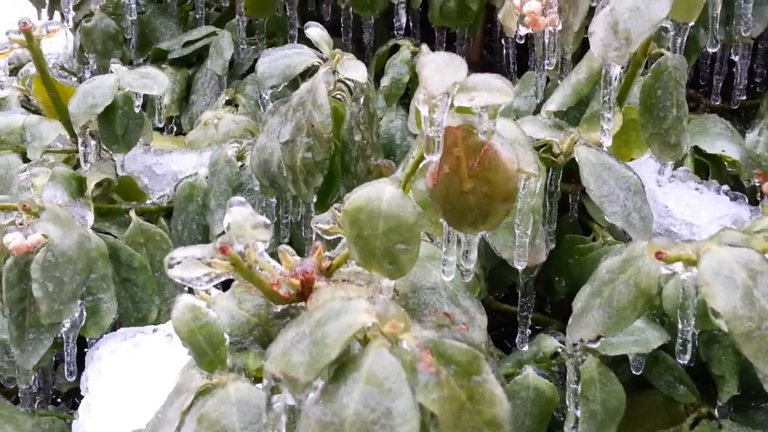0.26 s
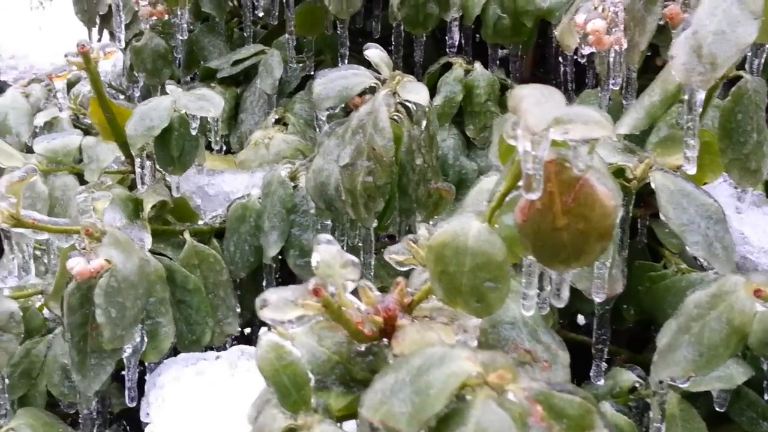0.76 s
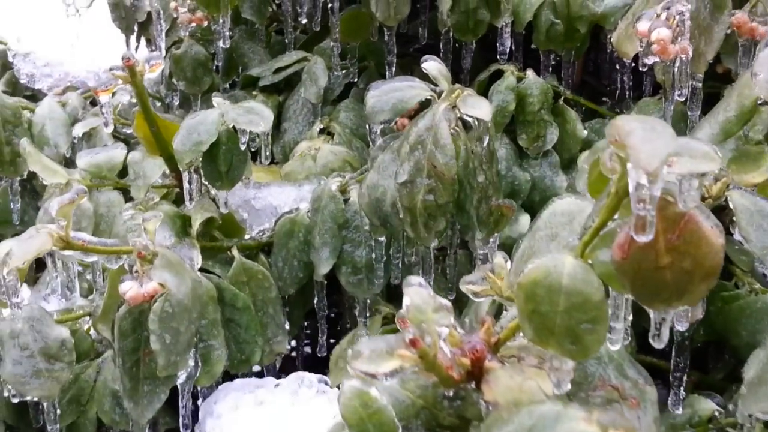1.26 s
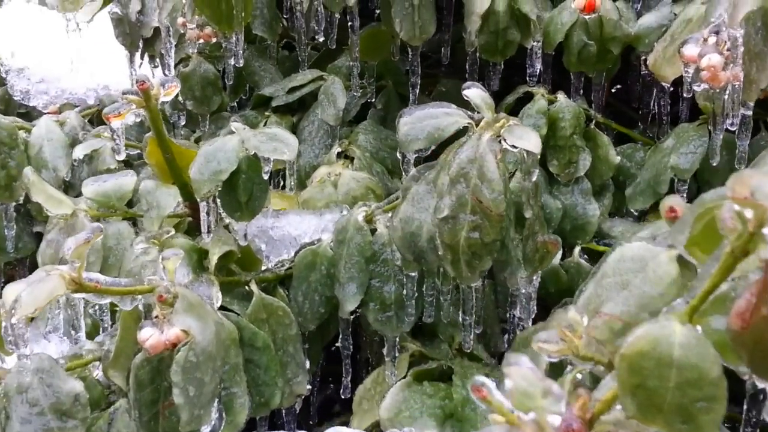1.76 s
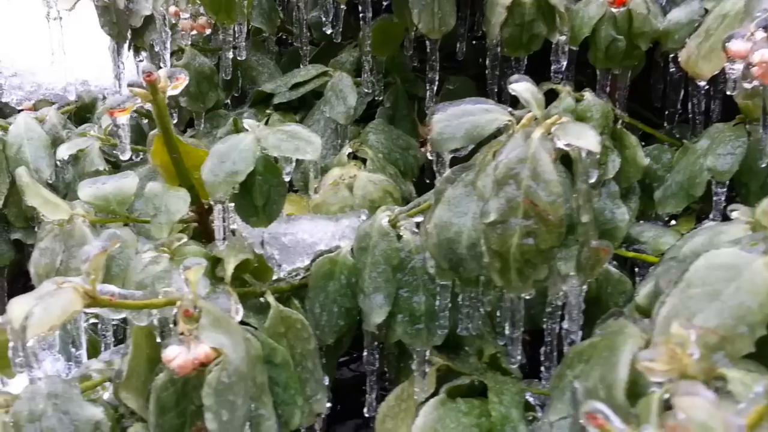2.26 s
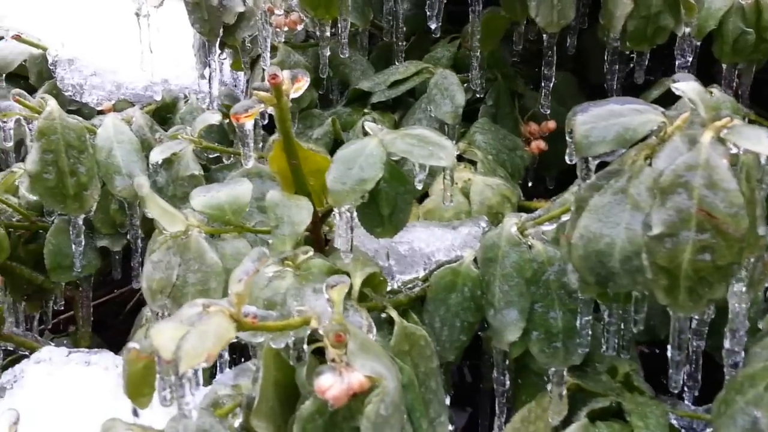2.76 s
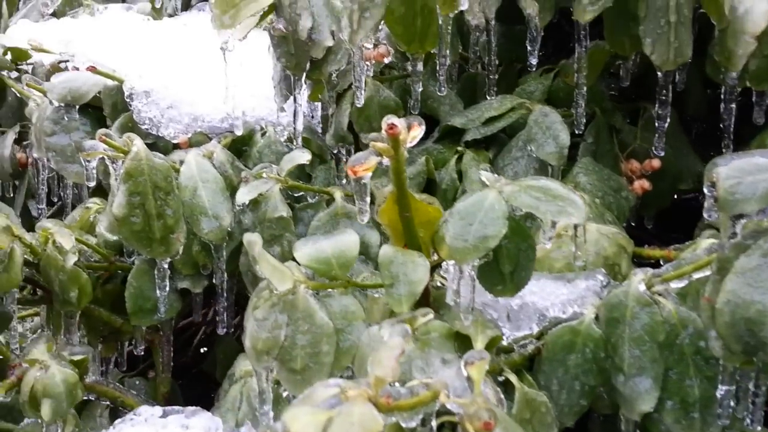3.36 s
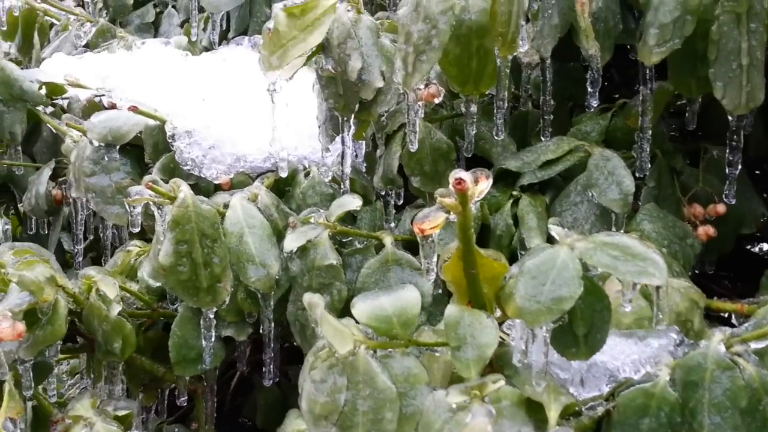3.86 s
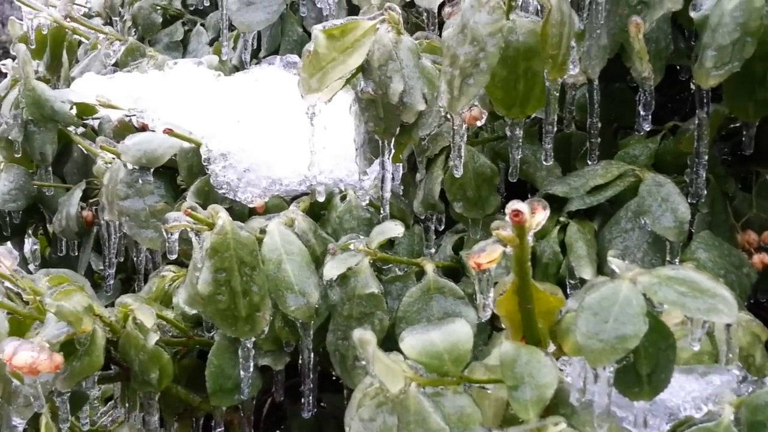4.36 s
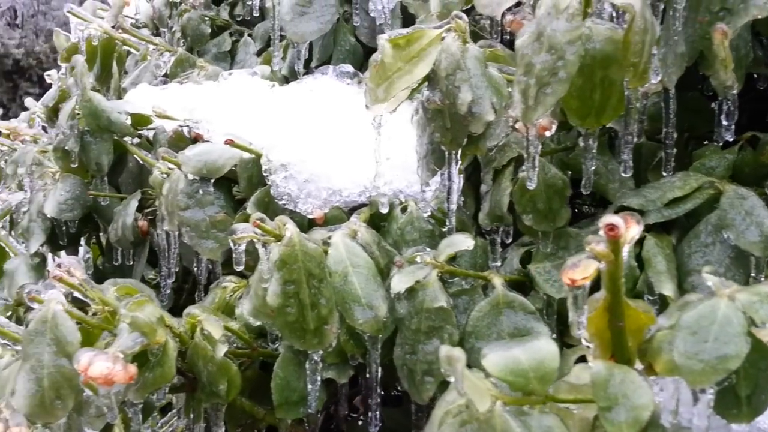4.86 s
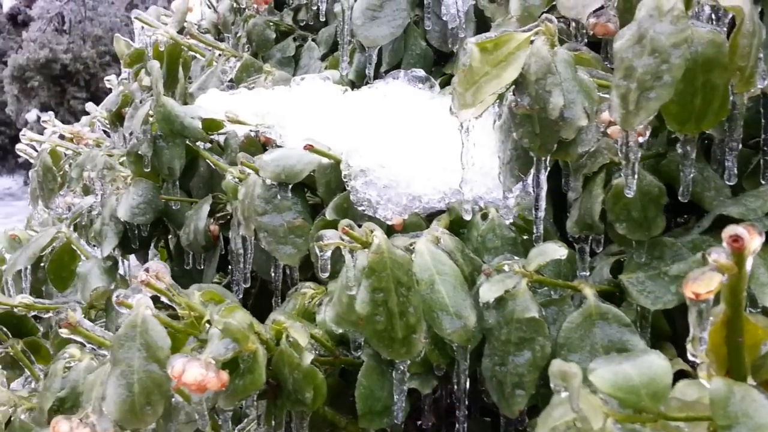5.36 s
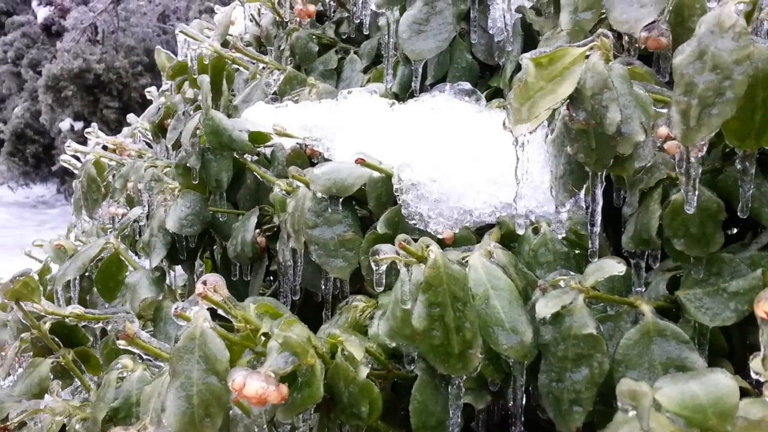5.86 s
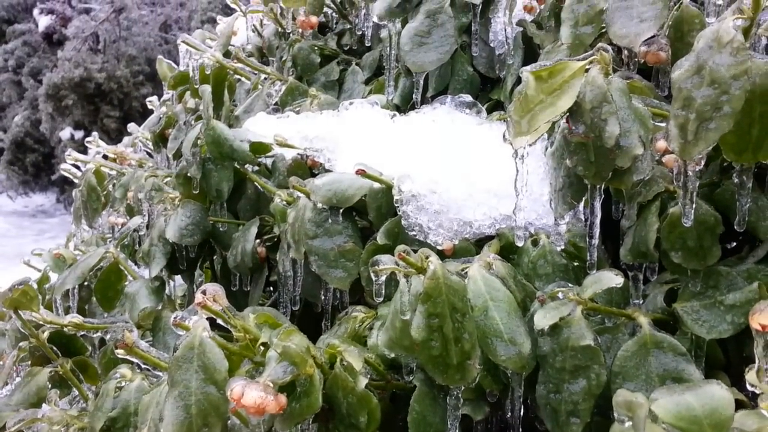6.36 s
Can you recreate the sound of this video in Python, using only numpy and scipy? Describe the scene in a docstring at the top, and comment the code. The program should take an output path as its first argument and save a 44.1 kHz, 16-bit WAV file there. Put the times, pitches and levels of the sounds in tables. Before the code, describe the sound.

Very close stereo view of an ice-coated bush outdoors. Over faint low rumble and hiss, light cracks lead to a sharp crunch, then a dense flurry of bright snaps, woody knocks and brief crunches. One more strong break follows, with a glassy clink. Crumbs trickle onto leaves and settle; later come soft dull bumps on the left, fine rustling and tiny clinks.

```python
"""A low, uneven outdoor rumble, a faint hiss and the fine rustle of iced leaves open the scene.
Ice glaze on an evergreen bush breaks close by: single snaps are fracture bursts with twig knocks; in crunches
a whole shell gives way as dense fractures and shakes its leaf. Branches spring back as dull thuds.
Soft pressure bumps reach the left port; a few crumbs tick on the camera case. Loose bits clink as short
resonances and patter as sparse ticks; leaves scatter the breaking sounds in a short bright tail."""
import sys
import numpy as np
from scipy import signal
from scipy.fft import rfft, irfft, next_fast_len
from scipy.io import wavfile
from scipy.ndimage import map_coordinates

SR = 44100
rng = np.random.default_rng(int(sys.argv[2]) if len(sys.argv) > 2 else 0)


def transcribe(u):
    """Save the signal u as a 16-bit wav file named by the first command-line argument.

    u: samples, shape (n,) or (channels, n), limited to [-1, 1]; the rate is SR.
    q: integer samples, one column per channel.
    """
    v = np.clip(np.atleast_2d(u).T, -1, 1)
    q = np.round(v * 32767).astype(np.int16)
    wavfile.write(sys.argv[1], SR, q)


N = 291489

# Table levels are nominal: the sources add their own trims. pan = left over right.
# colour of distant rumble: f/Hz, relative density/dB
RUMBLE_COLOUR = [(20, -18), (35, -10), (55, 2.5), (110, 1), (170, -3.5), (260, -7), (500, -14), (900, -21),
                 (2000, -37), (5000, -26.5)]
# rumble course: t/s, level/dB
RUMBLE_LEVEL = [(0, -53), (2.2, -52.5), (4.4, -54), (5.15, -53.5), (5.4, -48), (5.7, -53.5), (6.6, -52)]
# colour of hiss: f/Hz, relative density/dB
HISS_COLOUR = [(200, -23), (900, -1), (1700, 4.5), (2500, 2.5), (4000, 0), (7000, -1.5), (9000, -6.5),
               (14000, -4)]
# stirring and rustle of iced leaves: t/s, level/dB
STIR = [(0, -58), (.78, -52.5), (1.02, -61), (1.43, -66), (1.49, -44.5), (1.65, -45), (2.18, -44),
        (2.42, -42), (2.9, -47), (3.08, -55.5), (4.3, -56.5), (4.6, -46), (4.85, -44.5), (5.12, -51.5),
        (5.43, -44), (5.82, -45.5), (6.38, -42.5), (6.6, -47.5)]
# colour of rustle and crumbs: f/Hz, relative density/dB
PATTER_COLOUR = [(400, -4), (1000, -10), (1800, -5.5), (3000, -6), (5200, -1.5), (7000, 0.5), (14000, -8.5)]
# crumbs slipping off a leaf: t/s, level/dB
SHOWERS = [(0.195, -42.5), (0.65, -46), (0.709, -45), (0.859, -44.5), (1.205, -49), (2.319, -38),
           (2.931, -43), (3.204, -48.5), (3.374, -46.5), (3.95, -46), (4.05, -47), (4.335, -46),
           (4.969, -42), (5.655, -46.5)]
# single fractures, and dry ticks of crumbs on the camera case (large pan):
# t/s, crack or tick level/dB, knock level/dB, knock f/Hz, pan/dB (halved for the knock)
SNAPS = [(0.111, -31, -45, 2320, -2), (0.255, -25, -36.5, 2240, -1), (0.273, -26, -51, 2120, -4),
         (0.315, -26, -51, 2350, -6), (0.3775, -22, -25, 530, 0), (0.3832, -15, -22, 605, -11),
         (1.1225, -33.5, -37, 2480, 34), (1.2005, -48, -43.5, 1470, 2), (1.2367, -39.5, -65, 1520, -2),
         (1.473, -43.5, -49, 2600, -1), (1.5547, -26, -44, 1820, -3), (1.5768, -20.5, -23.5, 1590, -2.5),
         (1.6777, -22, -15, 1520, -3), (1.7436, -19, -15.5, 384, 0), (1.7822, -26.5, -25, 720, -1.5),
         (1.8232, -22, -32, 1500, -4), (1.845, -15, -23, 1160, 1), (1.9427, -24, -38, 2700, 1),
         (2.0198, -24, -29, 750, 3), (2.0264, -15.5, -26, 1180, -3.5), (2.158, -38, -62, 2150, -8),
         (2.5001, -38, -49, 1640, 10), (2.5503, -27.5, -43, 1020, 8), (2.6774, -21.5, -24.5, 1480, -4),
         (2.6914, -12, -29, 1900, -5), (2.7123, -19.5, -22, 1290, 0), (4.4596, -41, -73, 2040, -2),
         (4.5877, -39, -72, 1390, -7), (6.4313, -29, -61, 2250, 17)]
# colour of a crack or tick: f/Hz, relative density/dB
CRACK_COLOUR = [(300, -9), (1000, -7.5), (2000, 3.5), (4000, 3), (8000, 8.5), (14000, -1.5)]
# decay of the scatter in the bush: f/Hz, t60/s
BUSH_T60 = [(300, 0.13), (1500, 0.073), (5000, 0.12), (14000, 0.19)]
# shells giving way: collapse t/s, build-up/s, length/s, splinter level/dB, leaf level/dB
CRUNCHES = [(0.377, 0.013, 0.029, -18, -26.5), (0.423, 0.004, 0.025, -29.5, -33),
            (1.851, 0.005, 0.017, -9, -12.5), (1.897, 0.003, 0.015, -27.5, -33.5),
            (1.997, 0.002, 0.012, -27, -35), (2.027, 0.004, 0.0083, -14.5, -21),
            (2.691, 0.014, 0.032, -17.5, -23), (2.81, 0.015, 0.027, -23.5, -30)]
# body of an ice-coated leaf on its twig: f/Hz, relative density/dB
LEAF_COLOUR = [(70, -44.5), (140, -17.5), (205, -2), (270, -10), (450, -7), (710, 3), (810, -2), (900, 1),
               (1030, -15.5), (1250, -6.5), (1490, 0.5), (1850, -15), (2350, -4), (4000, -27)]
# branches springing back: t/s, level/dB, f/Hz
THUDS = [(0.3784, -28, 163), (0.3825, -28, 337), (0.651, -46, 148), (1.743, -25.5, 200), (1.852, -43, 196),
         (2.822, -34, 218)]
# soft bumps at the left port: t/s, level/dB, nominal f/Hz (sets the pulse width)
BUMPS = [(0.9066, -34.5, 230), (5.2853, -34, 188), (5.374, -24, 195), (5.4062, -38, 200),
         (5.9244, -18, 238), (6.0365, -26, 174)]
# spells of smaller dropping pieces: start/s, end/s, level/dB, pan/dB (halved in use)
SPELLS = [(2.22, 2.62, -40.5, 10), (5.66, 6.42, -42, 27)]
# clearest ringing pieces: t/s, level/dB, f/Hz, pan/dB (halved in use)
CLINKS = [(2.8412, -23.5, 5130, -9), (5.641, -37.5, 5250, 19), (6.0055, -34.5, 6040, 19.5),
          (6.072, -34.5, 5800, 21), (6.3877, -33.5, 5600, 24)]
# colour of the two microphone ports: f/Hz, left gain/dB, right gain/dB
PORT_COLOUR = [(860, 3.5, 3.5), (1620, -0.5, -0.5), (2260, -2, -2), (3670, 4.5, -1), (4050, 6, -4),
               (5300, 4, -1.5), (7070, -2, 7), (7730, -5.5, -0.5), (9800, -3.5, -3), (10500, -2, -2.5),
               (13700, -13, -3.5), (15300, -38, -5)]

BLOW_S = 0.005  # duration to which the level of a single blow refers
LEAD_SAMPLES = 3  # the right port leads the left
CEILING, TOP_HZ = 0.85, 14650  # peak limit, band limit
DEBRIS_DB, DEBRIS_T60_S = -20, 0.29  # crumbs relative to the blow that sheds them, settling time
SHOWER_RISE_S = 0.011  # time to the peak of a shower
STRAIN_DB = -7  # first crackling relative to the collapse
SAG_DB, RELEASE_T60_S = 3, 0.01  # weakening over the collapse, then its decay
PIECE_GAP_S, PIECE_HZ = 0.085, 5180  # typical spacing and pitch of smaller pieces


def amp(db):
    """Decibels to gain."""
    return 10 ** (np.asarray(db) / 20)


def unit(x):
    """Scale to rms 1."""
    return x / np.sqrt(np.mean(x ** 2) + 1e-20)


def dose(x, db, length_s=BLOW_S):
    """Give x the energy of a sound of this level and length."""
    energy = np.mean(np.sum(x ** 2, axis=-1))
    return x * amp(db) * np.sqrt(length_s * SR / (energy + 1e-20))


def along(points, hz):
    """Interpolate (f/Hz, value) points on a log axis."""
    f, v = np.transpose(points)
    return np.interp(np.log(hz + 1), np.log(f + 1), v)


def curve(rows):
    """Interpolate (t/s, value) rows to one value per sample."""
    return np.interp(np.arange(N) / SR, *np.transpose(rows))


def wobble(rate_hz):
    """Smooth random curve with this many knots a second."""
    knots = rng.standard_normal(int(N * rate_hz / SR) + 4)
    return map_coordinates(knots, [np.arange(N) * rate_hz / SR])


def filtered(x, response):
    """Filter x by a complex response of frequency."""
    n = x.shape[-1]
    m = 2 * next_fast_len(n)
    return irfft(rfft(x, m) * response(np.fft.rfftfreq(m, 1 / SR)), m)[..., :n]


def coloured(x, points):
    """Causal minimum-phase filter through (f/Hz, gain/dB) points."""
    size = 2048
    cepstrum = irfft(np.log(amp(along(points, np.fft.rfftfreq(size, 1 / SR)))))
    # fold onto positive time
    cepstrum[1:size // 2] *= 2
    cepstrum[size // 2 + 1:] = 0
    impulse = irfft(np.exp(rfft(cepstrum)))
    return signal.fftconvolve(np.atleast_2d(x), impulse[None], axes=1)[:, :x.shape[-1]]


def pair(n, shared):
    """Two white noises with a share of power in common."""
    share = np.clip(shared, 0, 1)
    common = np.sqrt(share) * rng.standard_normal(n)
    return common + np.sqrt(1 - share) * rng.standard_normal((2, n))


def panned(pan_db):
    """Left and right gains of constant power."""
    return unit(amp([[pan_db / 2], [-pan_db / 2]]))


def add(track, t_s, x):
    """Mix x into the track at t_s."""
    start = max(round(t_s * SR), 0)
    track[:, start:start + x.shape[-1]] += x[:, :N - start]


def from_right(x):
    """A mono sound that reaches the right port slightly earlier."""
    return np.array([np.pad(x, (LEAD_SAMPLES, 0))[:len(x)], x])


def resonance(hz, width_hz):
    """Response of one damped mode."""
    return lambda f: 1j * f * width_hz / (hz * hz - f * f + 1j * f * width_hz)


def knock(t, hz, t60_s):
    """A few heavily damped swings, with no net push of air."""
    return np.gradient(t * np.sin(2 * np.pi * hz * t) * amp(-60 * t / t60_s))


def fractures(n, rate_hz, spread_db, life_s):
    """Envelope of tiny decaying fractures at random times and of uneven sizes."""
    hits = rng.random(n) < rate_hz / SR
    sizes = amp(2 * spread_db * np.clip(rng.standard_normal(n), -2, 2))
    power = signal.lfilter([1], [1, -np.exp(-2 / (life_s * SR))], hits * sizes)
    return unit(np.sqrt(power + 1e-9))


def foliage(x):
    """Leaves all around scatter x into a short bright noise tail."""
    hz, t, z = signal.stft(rng.standard_normal((2, SR // 4)), SR, nperseg=128)
    decay = amp(-60 * t / along(BUSH_T60, hz)[:, None])
    tail = signal.istft(z * decay, SR, nperseg=128)[1]
    tail = coloured(tail, [(300, -22), (1500, 7.0), (4000, 4.5), (14000, -1)])
    tail = tail / np.linalg.norm(tail[0])
    tail = np.pad(tail, ((0, 0), (SR // 400, 0)))  # delay
    return signal.fftconvolve(x, tail, axes=1)[:, :N]


def background(rumble_db=0, hiss_db=-58, whistle_db=-68):
    """Uneven distant rumble, nearly mono, and an even hiss with one thin whistle on the left."""
    lumps = amp(1.5 * wobble(9) + 1.8 * wobble(28))
    rumble = unit(coloured(pair(N, shared=0.82), RUMBLE_COLOUR))
    # only the bass swells and sinks
    bass = filtered(rumble, lambda hz: 1 / (1 + (hz / 320) ** 4))
    rumble = (rumble + bass * (lumps - 1)) * amp(curve(RUMBLE_LEVEL) + rumble_db)
    hiss = unit(coloured(pair(N, shared=0.019), HISS_COLOUR)) * amp(hiss_db)
    line = resonance(4185, width_hz=150)
    whistle = unit(filtered(pair(N, shared=0), lambda hz: line(hz) ** 2))
    return rumble + hiss + whistle * amp(whistle_db) * panned(18)


def patter(rustle_db=-5, ticks_db=-3, trickle_db=-2, flutter_db=1.0):
    """Iced leaves rub in a fine rustle; crumbs tick on them as they trickle down in little showers."""
    rustle = fractures(N, rate_hz=2600, spread_db=2.0, life_s=0.011) * pair(N, shared=0.044)
    crumbs = fractures(N, rate_hz=120, spread_db=3.5, life_s=0.0016) * pair(N, shared=0.2)
    crumbs = unit(crumbs + amp(-3) * foliage(crumbs))
    mix = unit(coloured(amp(rustle_db) * rustle + amp(ticks_db) * crumbs, PATTER_COLOUR))
    flow = np.sqrt(amp(curve(STIR)) ** 2 + debris() + showers())
    return flow * amp(trickle_db + flutter_db * wobble(22)) * mix


def debris():
    """Power of falling crumbs: each row of SNAPS and CRUNCHES adds some by its energy; they soon settle."""
    shed = np.zeros(N)
    for t_s, db, *_ in SNAPS:
        shed[round(t_s * SR)] += amp(db + DEBRIS_DB) ** 2
    for t_s, _, length_s, db, _ in CRUNCHES:
        shed[round((t_s + length_s) * SR)] += amp(db + DEBRIS_DB) ** 2 * length_s / BLOW_S
    return signal.lfilter([1], [1, -amp(-60 / (DEBRIS_T60_S * SR)) ** 2], shed)


def showers():
    """Power of crumbs that slip off by themselves: each shower swells quickly and peters out."""
    out, age = np.zeros((1, N)), np.arange(SR // 4) / (SR * SHOWER_RISE_S)
    for t_s, db in SHOWERS:
        add(out, t_s, amp(db) ** 2 * (age * np.exp(1 - age))[None])
    return out[0]


def snaps(crack_db=-1, knock_db=0, crack_t60_s=0.023, knock_t60_s=0.0041, shove_db=-12, shove_hz=210,
          scatter_db=-4):
    """A crack runs through the glaze, the freed twig knocks and shoves its leaf; case ticks use the same burst."""
    out, far, t = np.zeros((2, N)), np.zeros((2, N)), np.arange(SR // 25) / SR
    for t_s, db, low_db, hz, pan_db in SNAPS + faint_snaps():
        grains = fractures(len(t), rate_hz=3800, spread_db=0.5, life_s=0.00013)
        burst = pair(len(t), shared=0.48) * grains
        crack = coloured(burst * amp(-60 * t / crack_t60_s), CRACK_COLOUR)
        crack = dose(crack, db + crack_db) * panned(pan_db)
        # one main jolt and the stutter of the burst drive the knock
        stutter = burst[0] * amp(-60 * t / 0.009)
        jolt = (t == 0) + 0.7 * stutter / np.linalg.norm(stutter)
        # higher knocks die sooner; knock_t60_s holds at 400 Hz
        twig = signal.fftconvolve(jolt, knock(t, hz, knock_t60_s * np.sqrt(400 / hz)))[:len(t)]
        shove = dose(knock(t, shove_hz, t60_s=0.0051), low_db + shove_db)
        body = dose(twig, low_db + knock_db) + shove
        add(out, t_s, crack + from_right(body) * panned(pan_db / 2))
        # ticks on the case right beside the left port stand far above their scatter
        add(far, t_s, crack * amp(-max(pan_db, 0) / 2))
    return out + amp(scatter_db) * foliage(far)


def faint_snaps(count=10, over_db=3, spread_db=2, knock_db=-24, knock_hz=1900, pan_db=-4):
    """Rows like SNAPS: here and there the glaze ticks by itself, louder the more the leaves stir."""
    place, size = rng.random((count, 2)).T
    times = (np.arange(count) + place) / count * (N / SR)
    levels = np.interp(times, *np.transpose(STIR)) + over_db + spread_db * (2 * size - 1)
    return [(t_s, db, db + knock_db, knock_hz, pan_db) for t_s, db in zip(times, levels)]


def crunches(splinter_db=-3.5, leaf_db=-2.5):
    """A shell of ice crumbles: dense fractures spray treble and shake the leaf under them."""
    out, t = np.zeros((2, N)), np.arange(SR // 8) / SR
    for t_s, build_s, length_s, db, low_db in CRUNCHES:
        force = fractures(len(t), rate_hz=1700, spread_db=3.5, life_s=0.0008)
        force = force * crumbling(t, build_s, length_s)
        splinters = coloured(force * pair(len(t), shared=0.069), CRACK_COLOUR)
        leaf = coloured(force * rng.standard_normal(len(t)), LEAF_COLOUR)[0]
        splinters = dose(splinters, db + splinter_db, length_s)
        leaf = dose(leaf, low_db + leaf_db, length_s)
        add(out, t_s - build_s, splinters + from_right(leaf))
    return out


def crumbling(t, build_s, length_s):
    """Envelope of a crunch: strain builds, the collapse sags as it runs, the last fractures die quickly."""
    end_s = build_s + length_s
    sag_db = np.interp(t, [0, build_s, end_s], [STRAIN_DB, 0, -SAG_DB])
    return amp(sag_db - 60 * np.maximum(t - end_s, 0) / RELEASE_T60_S)


def thuds(thud_db=0, thud_t60_s=0.023):
    """Relieved of its ice, a branch springs back with a dull push of air."""
    out, t = np.zeros((2, N)), np.arange(SR // 12) / SR
    for t_s, db, hz in THUDS:
        add(out, t_s, from_right(dose(knock(t, hz, thud_t60_s), db + thud_db)))
    return out


def bumps(bump_db=0, click_db=-17):
    """A round pressure crest in a slower trough, with a faint click; it hardly reaches the right port."""
    out, t = np.zeros((2, N)), np.arange(SR // 25) / SR
    for t_s, db, hz in BUMPS:
        phase = 2.24 * hz * (t - 0.004)
        swing = 2.2 * np.exp(-(2.2 * phase) ** 2) - np.exp(-phase ** 2)
        click = knock(t, hz=500, t60_s=0.0025)
        add(out, t_s, dose(swing, db + bump_db) * amp([[0], [-28]]))
        add(out, t_s + 0.0034, dose(click, db + click_db) * amp([[0], [-15]]))
    return out


def clinks(clink_db=-3, tick_db=-7, ring_t60_s=0.02, width_hz=520):
    """A falling piece ticks on a leaf, chatters briefly and rings at one pitch."""
    out, t = np.zeros((2, N)), np.arange(SR // 25) / SR
    for t_s, db, hz, pan_db in CLINKS + small_pieces():
        contact = pair(len(t), shared=0.23) * amp(-60 * t / ring_t60_s)
        ring = dose(filtered(contact, resonance(hz, width_hz)), db + clink_db)
        tick = dose(coloured(contact, CRACK_COLOUR), db + tick_db)
        add(out, t_s, (ring + tick) * panned(pan_db / 2))
    return out


def small_pieces(spread_db=3, spread_octaves=0.052, spread_pan_db=8):
    """Rows like CLINKS: in each spell pieces drop at uneven intervals, each with its own size and place."""
    rows = []
    for start_s, end_s, db, pan_db in SPELLS:
        draws = rng.uniform(-1.1, 1, size=(16, 4))
        for k, (late, size, pitch, side) in enumerate(draws):
            t_s = start_s + PIECE_GAP_S * (k + 0.5 + late / 2)
            hz = PIECE_HZ * 2 ** (spread_octaves * pitch)
            if t_s < end_s:
                rows.append((t_s, db + spread_db * size, hz, pan_db + spread_pan_db * side))
    return rows


def scene():
    """Outdoor floor, falling crumbs, breaking ice and case ticks, scatter, springing branches and bumps."""
    shards = crunches() + clinks()
    ice = snaps() + shards + amp(-7) * foliage(shards)
    return background() + patter() + ice + thuds() + bumps()


def record(dry):
    """Each port has its own colour; the loudest peaks are rounded off and the band is limited."""
    ports = np.array(PORT_COLOUR)
    left = coloured(dry[0], ports[:, [0, 1]])
    right = coloured(dry[1], ports[:, [0, 2]])
    both = np.vstack([left, right])
    rounded = both / (1 + (both / CEILING) ** 4) ** (1 / 4)
    return filtered(rounded, lambda hz: 1 / np.sqrt(1 + (hz / TOP_HZ) ** 240))


dry = scene()
out = record(dry)
transcribe(out)
```